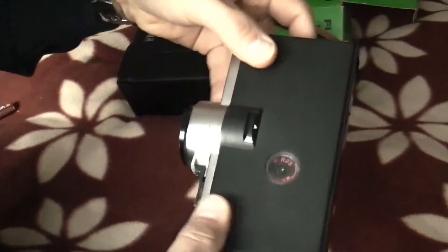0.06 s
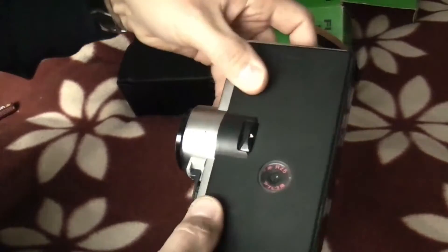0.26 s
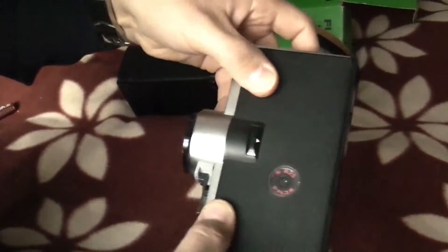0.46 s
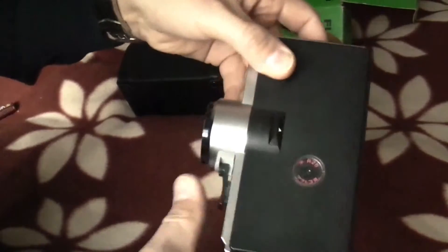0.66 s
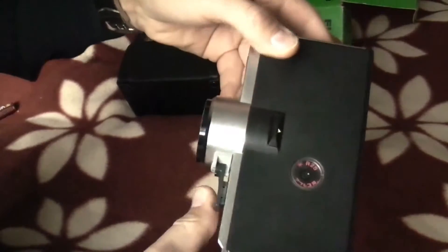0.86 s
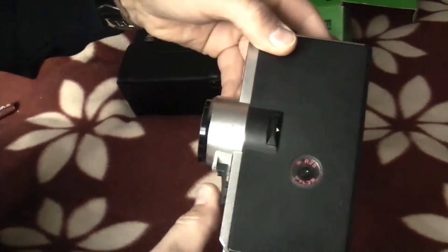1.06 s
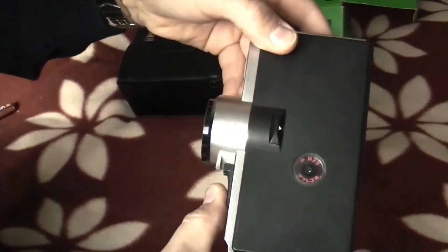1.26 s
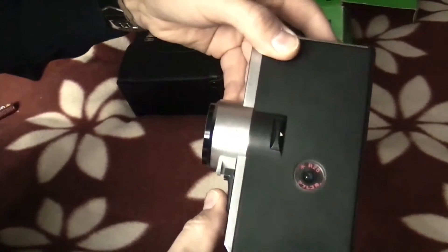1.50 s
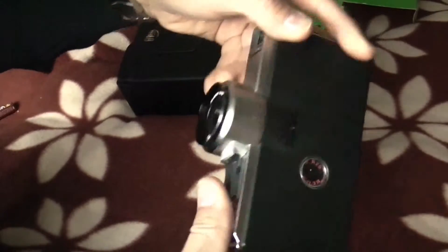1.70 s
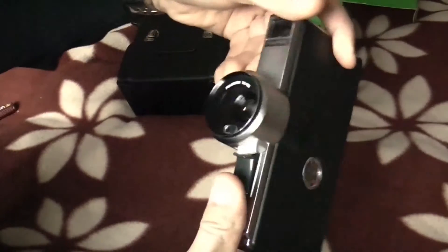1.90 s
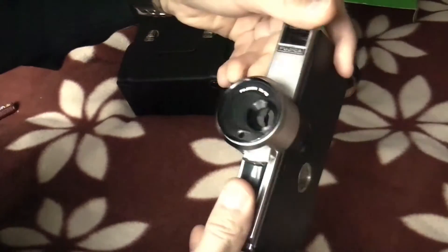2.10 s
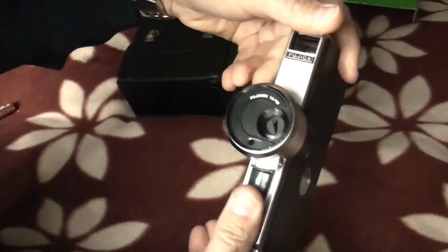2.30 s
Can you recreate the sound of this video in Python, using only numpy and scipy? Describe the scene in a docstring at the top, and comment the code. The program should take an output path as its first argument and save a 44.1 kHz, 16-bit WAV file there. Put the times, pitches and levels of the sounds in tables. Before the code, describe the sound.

A handheld movie camera clicks and latches, close to the microphone and toward the right. After a few light knocks, its gears whir briefly with rapid ticking and end in two sharp metallic clacks, over faint hiss in a small room.

```python
"""A small cine camera, handled close by on the right in a quiet room.
Its door rubs, squeaks and latches; the claw and gears run for half a second at 18 frames a second;
the mechanism stops with two hard clacks. Blows ring the body, the case and small steel parts.
A short room tail follows each sound, over low microphone noise and hiss."""
import sys
import numpy as np
from scipy import signal
from scipy.fft import rfft, irfft, next_fast_len
from scipy.io import wavfile

SR = 44100
rng = np.random.default_rng(int(sys.argv[2]) if len(sys.argv) > 2 else 0)


def materialize(psi):
    """Save the field psi as 16-bit PCM at rate SR to the path in sys.argv[1].

    A 1-D psi becomes a single channel; in a 2-D psi each row is a channel.
    """
    bounded = np.clip(np.atleast_2d(psi).T, -1, 1)
    quanta = np.round(bounded * 32767).astype(np.int16)
    wavfile.write(sys.argv[1], SR, quanta)


N = 108045
T = np.arange(N) / SR
AGE = np.arange(SR // 2) / SR  # time since a blow [s]
PAN_DB, CONTACT_SPREAD = -10.5, 0.88  # pan: left minus right

# case modes (frequency [Hz], level [dB], t60 [s])
CASE_MODES = [(950, 0.5, 0.065), (1136, -2.5, 0.04), (1200, 4, 0.022), (1440, -0.5, 0.035),
              (1662, -8, 0.017), (2110, -1.5, 0.005), (2460, -2, 0.03)]
# contact click spectrum (frequency [Hz], gain [dB])
CLICK_SPECTRUM = [(400, -41), (1500, -23.5), (2800, 6), (3700, 6), (4300, 4.5), (5000, 4), (6000, 1),
                  (7000, -3), (9500, -30.5), (15000, -40)]


def snaps(walls, hold_db_per_s=170):
    """Sprung parts hit home and rebound; loud hits overload the microphone with a low thump."""
    # blows (time [s], body [dB], body pitch [ratio], case [dB], click [dB], tick [dB], spring [dB],
    # room [dB], tail hold [s], rebound delay [s], rebound [dB], pan [dB], contact length [ratio])
    blows = [(0.2403, -18, 1.252, -23.5, -33, -29, -48, -4.5, 0.008, 0.001137, 1.5, -5.5, 1.26),
             (0.3563, -39.5, 0.94, -33, -28, -21, -39, 2.5, 0.082, 0.00089, -13, -2.5, 0.98),
             (1.6468, -30, 1.076, -26, -27.5, -27, -29, 1.5, 0.024, 0.0017, -1.5, -8, 0.53),
             (1.7062, -27.5, 1.392, -24.5, -26.5, -28, -23, 3, 0.045, 0.0011, -2, -6, 0.46),
             (1.7539, -38.5, 1.38, -27, -37, -58, -40, -9, .002, 0.0021, -18, -6.5, 1.05)]
    # spring modes (frequency [Hz], level [dB], t60 [s])
    spring_modes = [(1914, -2, 0.032), (2155, -1.5, 0.08), (3455, -13, 0.11), (4650, 3, .03),
                    (5860, -1.5, 0.02), (6745, -12.5, .012), (7460, 10, 0.012), (10020, -14, .015)]
    # tick spectrum (frequency [Hz], gain [dB])
    tick_spectrum = [(800, -48), (4000, -41), (6500, 2.5), (7700, 3.5), (8700, 2), (9600, 11.5),
                     (11500, -3.5), (13000, -10), (15000, -12.5), (16500, -19)]
    # extra treble on the left (frequency [Hz], gain [dB])
    left_treble = [(3000, -34), (7000, -12.5), (10000, -2), (14000, -7)]
    # microphone overload thumps (time [s], level [dB], pan [dB])
    thumps = [(0.2315, -46, -8), (0.3556, -36.5, 24.5), (1.707, -52.5, 10.5)]
    out = np.zeros((2, N))
    for (time_s, body_db, pitch, case_db, click_db, tick_db, spring_db,
         room_db, hold_s, rebound_s, rebound_db, pan_db, stretch) in blows:
        shell = thud(body_db, pitch) + ring(CASE_MODES, case_db - 11) + ring(spring_modes, spring_db)
        blow, rebound = (steel(case_db, click_db, tick_db, tick_spectrum, stretch) for _ in range(2))
        contact = blow + amp(rebound_db) * delay(rebound, rebound_s)
        tail_gain = amp(room_db - hold_db_per_s * np.maximum(hold_s - AGE, 0))  # slows the early decay
        tail = tail_gain * echo(shell + amp(4) * blow, walls)
        add(out, time_s, shell * pan(-9.5) + contact[:2] * pan(pan_db) + tail)
        add(out[:1], time_s, colour(contact[:1], left_treble))
    thump_hz, thump_decay_s = 45, 0.001
    thump = np.sin(2 * np.pi * thump_hz * AGE) * np.exp(-AGE / thump_decay_s)
    for time_s, db, pan_db in thumps:
        add(out, time_s, punch(thump, db) * pan(pan_db))
    return out


def film_drive(walls, start_s=1.158, stop_s=1.645, room_db=-4):
    """The claw pulls and returns once a frame over gritty gears, then drops back and rings the gate."""
    # claw strokes, pull and return in turn (time [s], level [dB])
    strokes = [(1.1585, -4), (1.1878, 0.5), (1.2166, 0), (1.2436, 0), (1.2722, 0.5), (1.2997, 2),
               (1.3283, 0.5), (1.3557, 3), (1.3841, 0.5), (1.4116, 2.5), (1.4400, 2.5), (1.4674, 4),
               (1.4958, 2.5), (1.5236, 3.5), (1.5517, 0), (1.5793, 3), (1.6073, 0.5), (1.6355, 3.5)]
    # pull, return and gate modes (frequency [Hz], level [dB], t60 [s])
    pull_modes = [(1176, -6.5, 0.029), (1402, -7, 0.048), (1777, 0, 0.026), (2298, 0.5, 0.024),
                  (3500, -25, 0.035), (4080, -8, 0.032), (5350, -13, 0.0088)]
    return_modes = [(1126, -7, 0.026), (1530, -2, .02), (2090, 8, 0.027), (2420, 1, 0.033),
                    (3920, -2, 0.016)]
    gate_modes = [(674.5, 1.5, .06), (1190, -2, 0.034), (1760, -7, .035), (2300, -17, .03)]
    # claw tick and gear spectra (frequency [Hz], gain [dB])
    tick_spectrum = [(4000, -18.5), (6500, -10), (7700, 5), (9000, -3), (10500, -10.5), (12000, -18.5),
                     (13500, -23.5), (15500, -49)]
    gear_spectrum = [(200, -15.5), (500, -5), (700, -2), (900, 1), (1250, 3.5), (2200, -1.5), (3000, -4),
                     (4200, -14), (6500, -13), (8000, -10), (11000, -18.5), (15000, -42.5)]
    claw_detune, gate_detune, scatter_db = 0.041, 0.028, 3
    contact_s, bounce_s, bounce_db = 0.0021, 0.006, -4
    claw = np.zeros((3, N))
    for k, (time_s, db) in enumerate(strokes):
        returning = k % 2
        ring_db, click_db, tick_db = (-42.5, -47.5, -47) if returning else (-36, -43.5, -49.5)
        modes = [(hz * (1 + rng.normal(0, claw_detune)), mode_db + rng.normal(0, scatter_db), t60_s)
                 for hz, mode_db, t60_s in (return_modes if returning else pull_modes)]
        contact = crack(CLICK_SPECTRUM, contact_s, click_db) + crack(tick_spectrum, contact_s, tick_db)
        add(claw, time_s, amp(db) * (ring(modes, ring_db) + contact))
        if returning:
            gate = ring(gate_modes, db + ring_db + bounce_db, pitch=1 + rng.normal(0, gate_detune))
            add(claw, time_s + bounce_s, gate[None])
    gears = grit(gear_spectrum, db=-46.5, grain_db=4) * ((T > start_s) & (T < stop_s))
    return (claw[:2] + gears) * pan(PAN_DB) + amp(room_db) * echo(claw[2:] + gears, walls)


def knocks(walls):
    """Fingers and levers knock the body and case."""
    # blows (time [s], body [dB], body pitch [ratio], case [dB], click [dB], tick [dB], room [dB])
    blows = [(.006, -52, 1.25, -49, -58, -74, -12), (0.026, -57, 1.13, -41, -47, -53.5, 5),
             (0.0378, -44.5, 1.03, -36.5, -41, -61, -14.5), (0.1436, -34.5, 1.01, -36, -41, -54, -1),
             (0.1708, -61, 1.5, -41.5, -53, -53, 8.5), (0.1786, -60, 1.2, -36, -53, -51, -15),
             (0.1864, -42, 1.13, -47, -61, -65, 3.5), (0.199, -64, 1.2, -48, -51, -64, -11),
             (0.2081, -21.5, 0.95, -25.5, -37.5, -46, -3.5), (0.2286, -25, 0.915, -28.5, -27.5, -41, -3.5),
             (0.549, -43, 0.95, -47.5, -65, -83, 2.5), (.599, -56.5, 0.63, -47, -59, -75, 4),
             (.617, -62, 1.06, -57.5, -60.5, -65.5, 1), (0.6706, -51, 1.45, -47, -76, -87, -6),
             (0.756, -63, 1.43, -56.5, -70, -84.5, -3.5), (.8100, -28.5, 0.96, -35, -41, -47, -1.5),
             (1.0559, -44.5, 1.63, -37.5, -42, -49, -2.5), (1.067, -58, 1.16, -55, -53, -61, 0),
             (1.085, -48.5, 1.45, -42, -78, -72, -0.5), (1.128, -69, 1.3, -51, -60, -75, 1),
             (1.143, -64, 1.4, -49, -61, -73, 0), (1.7099, -30.5, 1.56, -27, -27, -32, -1),
             (1.987, -55.5, 1.6, -53.5, -68.5, -71, -4), (2.407, -48, 1.62, -49.5, -58, -61, -3.5)]
    # tick spectrum (frequency [Hz], gain [dB])
    tick_spectrum = [(4000, -20.5), (6500, -10), (7800, 1), (9000, 0.5), (10300, 0.5), (11500, -12),
                     (13500, -18.5), (16000, -33.5)]
    out = np.zeros((2, N))
    for time_s, body_db, pitch, case_db, click_db, tick_db, room_db in blows:
        shell = thud(body_db, pitch) + ring(CASE_MODES, case_db - 9)
        knock = shell + steel(case_db, click_db, tick_db, tick_spectrum)
        add(out, time_s, knock[:2] * pan(-11.5) + amp(room_db) * echo(knock, walls))
    return out


def thud(db, pitch):
    """The struck body rings, too small to radiate much bass."""
    # body modes (frequency [Hz], level [dB], t60 [s])
    body_modes = [(293, -18, 0.062), (405, -9.5, 0.02), (553, 1, 0.023), (616, 5.5, 0.0087),
                  (811, 3.5, 0.0079)]
    # bass roll-off (frequency [Hz], gain [dB])
    bass_rolloff = [(80, -19.5), (180, -7.5), (320, -3.5)]
    return punch(colour(ring(body_modes, 0, pitch), bass_rolloff), db)


def steel(case_db, click_db, tick_db, tick_spectrum, stretch=1):
    """Contact noise of one blow: case clatter, click and bright tick."""
    # case clatter spectrum (frequency [Hz], gain [dB])
    clatter_spectrum = [(100, -34), (300, -18.5), (900, 1.5), (2000, 3.5), (2800, -7), (4500, -26.5),
                        (12000, -44.5)]
    clatter = crack(clatter_spectrum, decay_s=0.0039 * stretch, db=case_db - 2)
    click = crack(CLICK_SPECTRUM, decay_s=0.0022 * stretch, db=click_db)
    tick = crack(tick_spectrum, decay_s=0.0015 * stretch, db=tick_db)
    return clatter + click + tick


def ring(modes, db, pitch=1):
    """Damped modes set off by one blow, neighbours in opposite phase."""
    partials = ((-1) ** k * amp(mode_db) * np.sin(2 * np.pi * hz * pitch * AGE) * decay(t60_s)
                for k, (hz, mode_db, t60_s) in enumerate(modes))
    return punch(sum(partials), db)


def crack(spectrum, decay_s, db, attack_s=0.00012):
    """Dense, quickly damped contact ringing. Rows: left, right, smooth feed to the room."""
    envelope = (1 - np.exp(-AGE / attack_s)) * np.exp(-AGE / decay_s)
    burst = noise(len(AGE), CONTACT_SPREAD) * envelope
    impulse = AGE == 0
    return punch(colour(np.vstack([burst, impulse]), spectrum), db)


def rubbing(walls, room_db=-9):
    """Grainy friction of fingers and door, with two thin squeaks."""
    # rubs (start [s], length [s], level [dB])
    rubs = [(0, .14, -56.5), (0.164, 0.18, -52.5), (0.24, .006, -27.5), (0.57, 0.052, -57.5),
            (0.657, 0.022, -65), (1.118, 0.044, -61)]
    # friction spectrum (frequency [Hz], gain [dB])
    rub_spectrum = [(150, 1), (500, -3.5), (1200, -3.5), (2500, -1), (6000, -10), (11000, -12),
                    (16000, -37.5)]
    # door squeaks (start [s], length [s], frequency [Hz], level [dB])
    squeaks = [(.170, 0.00973, 6700, -40.5), (0.181, 0.01, 6560, -41.5)]
    envelope = sum(amp(db) * swell(start_s, length_s) for start_s, length_s, db in rubs)
    out = grit(rub_spectrum, db=0, grain_db=3.5) * envelope
    for start_s, length_s, hz, db in squeaks:
        band = [(hz * 0.8, -45), (hz * 0.95, -5), (hz, 0), (hz * 1.05, -5), (hz * 1.2, -45)]
        out += level(colour(rng.standard_normal(N), band), db) * swell(start_s, length_s)
    return out * pan(PAN_DB) + amp(room_db) * echo(out, walls)


def grit(spectrum, db, grain_db, grain_samples=64):
    """Coloured noise in grains of uneven level."""
    grains = np.repeat(rng.standard_normal(N // grain_samples + 1), grain_samples)[:N]
    return level(colour(noise(N, CONTACT_SPREAD) * amp(grain_db * grains), spectrum), db)


def room(wall_s=0.011, wall_db=-12, onset_s=0.0033, crossover_hz=4000):
    """Small-room response: one near wall and a diffuse tail whose treble dies slightly sooner."""
    # room colour (frequency [Hz], gain [dB])
    room_spectrum = [(100, -15.5), (300, -12), (600, -7), (1000, -6), (2000, -5), (4000, -0.5), (6500, -1),
                     (10000, -7), (13000, 4.5), (16000, -13.5)]
    wash = noise(len(AGE), spread=0.91)
    low = signal.sosfiltfilt(signal.butter(2, crossover_hz, fs=SR, output="sos"), wash)
    onset = 1 - np.exp(-(AGE / onset_s) ** 2)
    tail = (low * decay(t60_s=0.23) + (wash - low) * decay(t60_s=0.22)) * onset
    tail = level(tail, 0) / np.sqrt(len(AGE))  # unit energy
    tail[:, int(wall_s * SR)] += amp(wall_db)
    return colour(tail, room_spectrum) * pan(PAN_DB)


def echo(x, walls):
    """The room's return of the last row of x."""
    return signal.fftconvolve(x[-1:], walls, axes=1)[:, :x.shape[-1]]


def background():
    """Low microphone noise and hiss; the level dips at the latch and creeps back."""
    # low noise and hiss spectra (frequency [Hz], gain [dB])
    low_noise_spectrum = [(25, -3), (50, -5), (90, -4.5), (200, 0.5), (400, -2), (800, -8.5), (1600, -14),
                          (3000, -27.5), (8000, -65)]
    hiss_spectrum = [(500, -14), (2000, 1.5), (4000, -1.5), (6400, -1), (9000, -6), (13000, -5.5),
                     (14500, -24.5), (16000, -19)]
    # level contour (time [s], gain [dB])
    contour = [(0, 6.5), (.23, 7.5), (.33, 4), (.39, -6), (.48, -2), (1, -1), (1.9, 0.5), (2.25, 3),
               (2.45, 1)]
    low_noise = level(colour(noise(N, spread=0.94), low_noise_spectrum), db=-56.5) * pan(2)
    hiss = level(colour(noise(N, spread=1), hiss_spectrum), db=-67) * pan(-6)
    return (low_noise + hiss) * amp(np.interp(T, *np.array(contour).T))


def amp(db):
    """Decibels to gain."""
    return 10 ** (np.asarray(db) / 20)


def pan(db):
    """Constant-power gains, left minus right in dB."""
    gains = amp([[db / 2], [-db / 2]])
    return gains / np.sqrt(np.mean(gains ** 2))


def decay(t60_s):
    """Exponential fall, 60 dB in t60_s."""
    return np.exp(-np.log(1000) * AGE / t60_s)


def swell(start_s, length_s):
    """Rounded rise and fall."""
    progress = np.clip((T - start_s) / length_s, 0, 1)
    return np.sqrt(np.abs(np.sin(np.pi * progress)))


def colour(x, spectrum):
    """Minimum-phase filter through (frequency [Hz], gain [dB]) points."""
    size = next_fast_len(2 * x.shape[-1])
    size += size % 2
    hz, db = np.array(spectrum, float).T
    bin_hz = np.fft.rfftfreq(size, 1 / SR)
    log_gain = np.interp(np.log(bin_hz + 1), np.log(hz), db) * np.log(10) / 20
    cepstrum = irfft(log_gain)[:size // 2]
    cepstrum[1:] *= 2
    return irfft(rfft(x, size) * np.exp(rfft(cepstrum, size)))[..., :x.shape[-1]]


def noise(size, spread):
    """Stereo noise, identical at spread 0, independent at 1."""
    shared = rng.standard_normal(size)
    return np.sqrt(1 - spread ** 2) * shared + spread * rng.standard_normal((2, size))


def level(x, db):
    """Set the rms."""
    return amp(db) * x / np.sqrt(np.mean(x ** 2, axis=-1, keepdims=True))


def punch(x, db, window_s=0.008):
    """Set a short sound's level, as its energy spread over window_s."""
    return amp(db) * x / np.sqrt(np.sum(x ** 2, axis=-1, keepdims=True) / (window_s * SR))


def delay(x, delay_s):
    """Delay x, keeping its length."""
    return np.pad(x, ((0, 0), (int(delay_s * SR), 0)))[:, :x.shape[-1]]


def add(out, time_s, x):
    """Mix x in at time_s."""
    start = int(time_s * SR)
    out[:, start:start + x.shape[-1]] += x[:, :N - start]


def scene():
    """All parts of the camera in one room."""
    walls = room()
    return knocks(walls) + snaps(walls) + film_drive(walls) + rubbing(walls) + background()


def record(dry, cutoff_hz=16500):
    """Clip at full scale, then low-pass."""
    lowpass = signal.ellip(8, 0.2, 80, cutoff_hz, fs=SR, output="sos")
    return signal.sosfilt(lowpass, np.clip(dry, -1, 1))


dry = scene()
out = record(dry)
materialize(out)
```